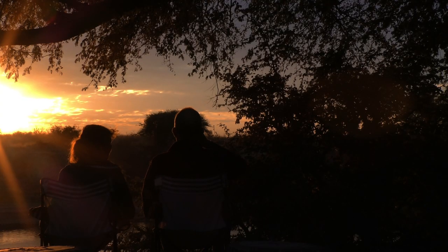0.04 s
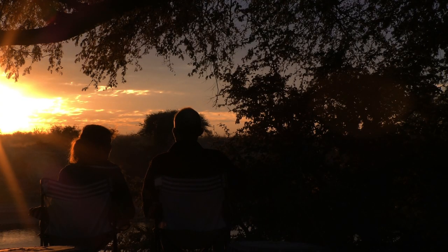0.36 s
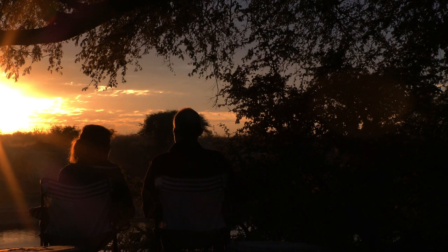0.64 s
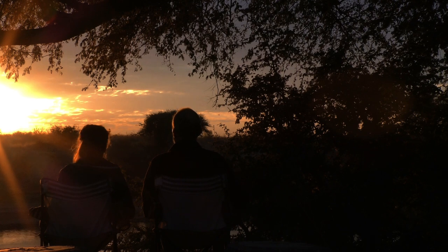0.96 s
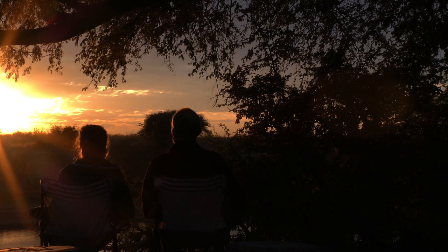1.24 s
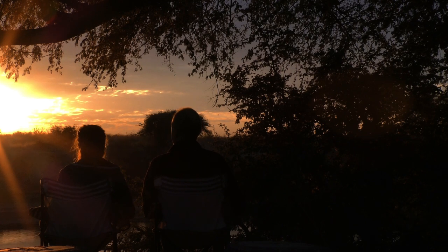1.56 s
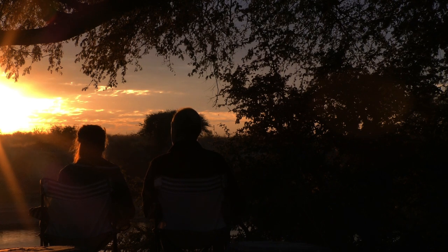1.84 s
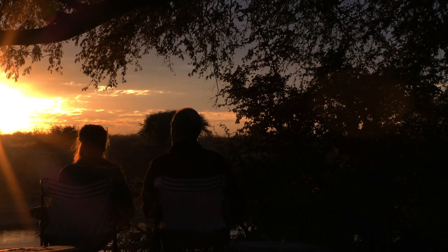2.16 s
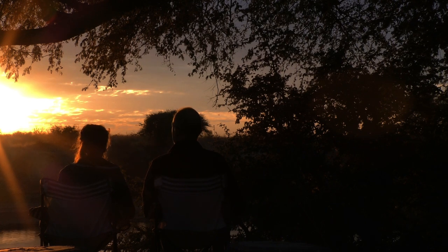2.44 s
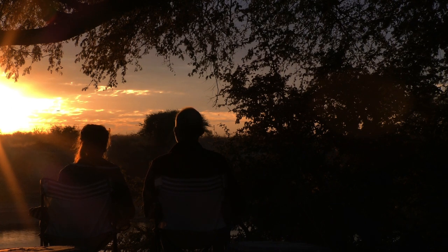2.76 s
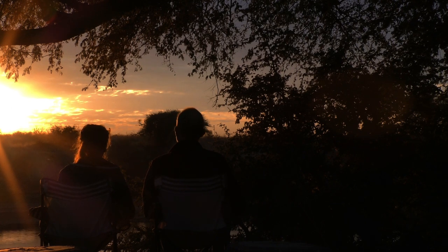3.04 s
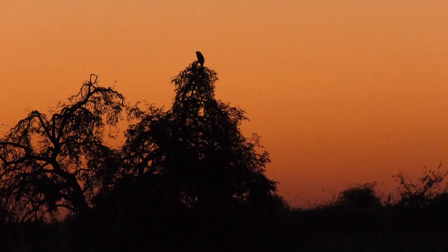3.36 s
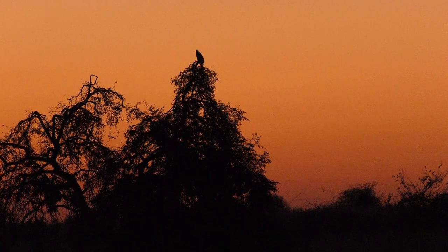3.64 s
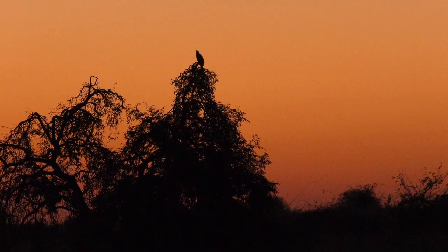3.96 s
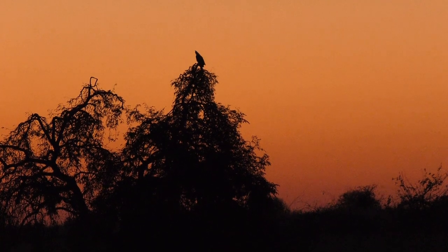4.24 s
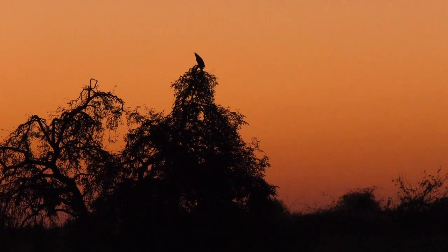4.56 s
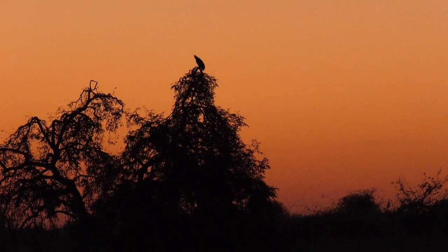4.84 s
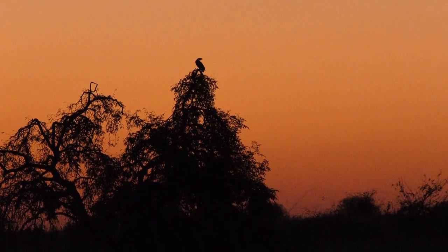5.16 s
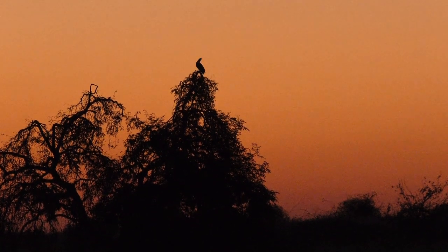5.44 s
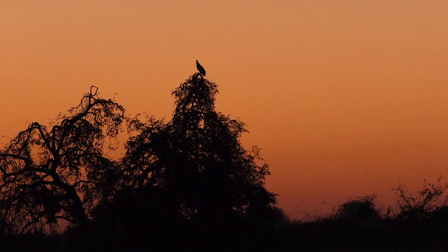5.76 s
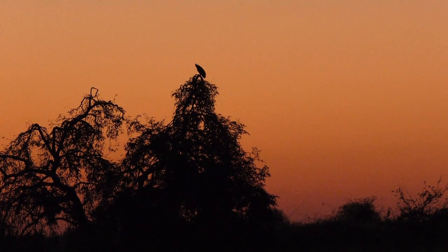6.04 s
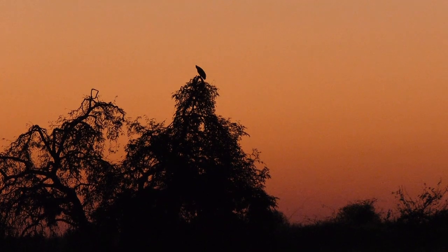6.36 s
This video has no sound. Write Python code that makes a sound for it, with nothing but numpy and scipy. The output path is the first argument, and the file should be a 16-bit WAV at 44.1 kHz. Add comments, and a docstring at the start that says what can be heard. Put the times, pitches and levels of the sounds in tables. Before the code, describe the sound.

Sharp bird chatter and dry trills in open bush, then softer calls and four high eagle yelps, over rumbling air and faint hum.

```python
"""Dusk by a savanna river, over a low rumble of air, soft bumps, a small motor's hum and a hiss.
First small birds chatter: sharp yaps, chirps that grow out of clicks, and thin, far-off whistles.
Dry trills of clicks join in after a second. Everything fades to silence just after three seconds,
then returns with softer chatter. Near five seconds a fish eagle starts to yelp, four times in all:
its voice scoops up, cracks into a held note and drops, and the bush echoes it."""
import sys
import numpy as np
from scipy import signal
from scipy.fft import rfft, irfft, next_fast_len
from scipy.io import wavfile

SR = 44100
rng = np.random.default_rng(int(sys.argv[2]) if len(sys.argv) > 2 else 0)


def unload_audio(sound):
    """Save the sound as a 16-bit wav file, at the path given as the first command line argument."""
    columns = np.transpose(np.atleast_2d(sound))
    # keep every value between -1 and 1, then stretch to whole-number steps
    steps = np.round(np.clip(columns, -1, 1) * 32767)
    wavfile.write(sys.argv[1], SR, steps.astype(np.int16))


N = 290619
T = np.arange(N) / SR
SILENCE_S = 3.235   # the moment between fading out and fading in


def from_db(db):
    """Turn decibels into a number to multiply a sound by."""
    return 10 ** (np.asarray(db) / 20)


def unit_power(x):
    """Scale a sound so that its average power is 1."""
    return x / np.sqrt(np.mean(x ** 2) + 1e-20)


def along(rows, t):
    """Join a table's rows with straight lines and read them where the first column equals t."""
    points, *columns = np.transpose(rows)
    return [np.interp(t, np.sort(points), column) for column in columns]


def waver(size, rate):
    """A random wobble, about 1 in size, that heads for a new value `rate` times a second."""
    knots = np.arange(size) * rate / SR
    return np.interp(knots, np.arange(size), rng.standard_normal(size))


def phase_of(hz):
    """The angle a vibration has turned through as it follows a changing pitch."""
    return 2 * np.pi * np.cumsum(hz) / SR


def band(x, low_hz, high_hz):
    """Keep what lies between two frequencies and soften the rest."""
    return signal.sosfilt(signal.butter(2, [low_hz, high_hz], "band", fs=SR, output="sos"), x)


def add(out, start_s, sound):
    """Mix a sound in at its start time."""
    i = round(start_s * SR)
    lo, hi = max(i, 0), min(i + len(sound), N)
    if hi > lo:
        out[lo:hi] += sound[lo - i:hi - i]


def placed(x, left_db):
    """Set a sound to one side; below zero means to the right."""
    return x * from_db([[left_db / 2], [-left_db / 2]])


def stereo_noise(spectrum):
    """Steady noise, alike in both ears in the bass and mostly different in the high treble."""
    # how alike the two ears are: (frequency [Hz], likeness [0-1])
    likeness = [(30, 0.94), (300, 0.96), (1000, 0.52), (3000, 0.95), (5000, 0.21), (8000, .15), (15000, .1)]
    size = next_fast_len(N)
    log_hz = np.log(np.maximum(np.arange(size // 2 + 1) * SR / size, 1))
    hz, db = np.transpose(spectrum)
    outside = np.abs(log_hz - np.clip(log_hz, np.log(hz[0]), np.log(hz[-1])))
    gain = from_db(np.interp(log_hz, np.log(hz), db) - 40 * outside) * np.sqrt(SR / 2)
    alike_hz, alike = np.transpose(likeness)
    alike = np.interp(log_hz, np.log(alike_hz), alike)
    width = np.sqrt((1 - alike) / (1 + alike))
    mid, side = rfft(rng.standard_normal((2, size))) * gain
    return irfft(mid + width * side * [[1], [-1]], size)[:, :N]


def background():
    """Air rumbles, a hiss runs on and a motor hums at a slightly uneven speed."""
    # Each table holds one list for before the silence and one for after it.
    # rumble of the air: (frequency [Hz], relative level [dB])
    rumbles = [
        [(15, 11), (29, -2.5), (59, -12), (100, -19.5), (150, -27.5), (230, -27.5), (330, -29), (470, -36.5),
         (700, -63)],
        [(15, 8), (32, -10.5), (52, -25), (70, -32), (130, -40), (180, -46), (330, -43), (470, -54), (700, -54)],
    ]
    # hiss: (frequency [Hz], level in a band 1 Hz wide [dB])
    hisses = [
        [(400, -92), (700, -84.5), (1200, -88.5), (2500, -87), (4500, -90.5), (6000, -92), (10000, -92.5),
         (15000, -93.5)],
        [(400, -98), (700, -89), (1400, -93), (2500, -95), (4500, -100.5), (6500, -97), (8400, -93.5),
         (9100, -102), (10300, -102), (11200, -91.5), (13500, -89), (15000, -91)],
    ]
    # tones of the motor: (pitch [Hz], level [dB])
    hums = [
        [(252, -47.5), (504, -65)],
        [(253.5, -56), (507, -67)],
    ]
    parts, rumble_levels_db = [T < SILENCE_S, T >= SILENCE_S], [-32.5, -23.5]
    out = 0
    for part, rumble, rumble_db, hiss, hum in zip(parts, rumbles, rumble_levels_db, hisses, hums):
        speed = 1 + .0036 * waver(N, 12)
        motor = sum(from_db(db + 1.4 * waver(N, 13)) * np.sin(phase_of(hz * speed)) for hz, db in hum)
        air = from_db(rumble_db) * unit_power(stereo_noise(rumble))
        out = out + part * (air + stereo_noise(hiss) + motor)
    return out


def bumps(swell_s=.024):
    """Short, muffled swells of low noise."""
    # soft bumps: (time [s], pitch [Hz], level [dB])
    swells = [(1.568, 228, -43), (1.631, 205, -38), (1.634, 75, -42), (1.662, 366, -47.5),
              (2.952, 178, -38), (3.387, 70, -32.5), (3.52, 126, -43), (3.889, 122, -43.5),
              (4.56, 125, -47), (4.655, 139, -49), (5.525, 64.4, -35.5), (6.055, 123, -40)]
    out, t = np.zeros(N), np.arange(-2 * swell_s, 2 * swell_s, 1 / SR)
    for s, hz, db in swells:
        noise = band(rng.standard_normal(SR // 2), hz * .72, hz * 1.2)[-len(t):]
        add(out, s + t[0], from_db(db) * unit_power(noise) * np.exp(-(t / swell_s) ** 2))
    return out


def bush(x, echo_s, echo_db, tail_db, decay_s, onset_s):
    """The nearest trees send back one echo; farther ones scatter the sound into a dying tail."""
    t = np.arange(2 * SR) / SR
    scatter = band(rng.standard_normal(len(t)), 600, 4900) * from_db(-60 * t / decay_s)
    scatter *= 1 - np.exp(-(t / onset_s) ** 2)
    response = from_db(tail_db) * scatter / np.sqrt(np.sum(scatter ** 2))
    response[round(echo_s * SR)] += from_db(echo_db)
    return x + signal.fftconvolve(x, response)[:N]


def bush_ring(start_db=-56.5, loss_db_per_s=9):
    """Narrow, dying noise: the bush rings faintly at the eagle's pitch as the sound fades in."""
    level_db = start_db - loss_db_per_s * (T - SILENCE_S) + 3 * waver(N, 14)
    ring = unit_power(band(rng.standard_normal(N), 1250, 1620))
    return (T >= SILENCE_S) * from_db(level_db) * ring


def whistles(octave_db=-18, jitter=.001):
    """Far-off birds whistle notes that rise and fall, with a faint tone an octave above."""
    # whistles: (time [s], length [s], pitch [Hz], level [dB], glide [octaves])
    notes = [(.193, 0.15, 2325, -37.5, 0.014), (1.098, 0.16, 2290, -34, -0.027),
             (2.089, .11, 924, -51, -0.27)]
    # shape of one whistle: (share of its length [0-1], pitch [ratio], level [dB])
    shape = [(0, .87, -6.5), (.27, 0.96, 0), (.58, 1, 1), (.87, .988, 0), (1, .94, -12.5)]
    out = np.zeros(N)
    for s, length, hz, db, glide in notes:
        share = np.linspace(0, 1, int(length * SR))
        ratio, shape_db = along(shape, share)
        pitch = hz * ratio * 2 ** (glide * (share - .5))
        phase = phase_of(pitch * (1 + jitter * waver(len(share), 300)))
        tone = np.sin(phase) + from_db(octave_db) * np.sin(2 * phase)
        add(out, s, tone * from_db(db + shape_db) * signal.windows.tukey(len(share), .1))
    return out


def click(top_hz, bottom_hz, length_s):
    """A bird's voice box opens once and lets out a tiny, steeply falling whistle."""
    size = max(int(length_s * SR), 8)
    pitch = np.linspace(top_hz, bottom_hz, size) * rng.normal(1, .044)
    return np.sin(phase_of(pitch)) * np.hanning(size)


def trills(first_s=1.156, period_s=.1085, slowing_s=.00045, count=18, gain_db=-2):
    """Dry runs of clicks that slow down as they swell and hurry as they die."""
    # stray trills after the long series: (time [s], length [s], relative level [dB])
    strays = [(4.023, 0.011, -41.5), (4.335, .031, -43.5), (4.433, 0.025, -37), (4.655, .018, -37),
              (4.747, .023, -46)]
    series = [(first_s + k * (period_s + k * slowing_s), .088, -30.5) for k in range(count)]
    out = np.zeros(N)
    for start, length, db in series + strays:
        s = 0
        while s < length:
            swell = np.sin(np.pi * (s / length) ** 1.4)
            high = click(top_hz=4300 + 450 * swell, bottom_hz=2250, length_s=.0028)
            gain = from_db(db + gain_db + 8 * (swell - 1) + rng.normal(0, 1.6))
            low = from_db(-10) * click(top_hz=2750, bottom_hz=1160, length_s=.00248)
            add(out, start + s, gain * high)
            add(out, start + s, gain * low)
            s += .005 + .003 * swell
    return out


def chirps(edge_s=.00097, click_count=9, gap_s=.0042, widening_s=.0002):
    """Clicks swell, crowd together and melt into a clear whistle that flicks up at its end."""
    # chirps: (time [s], length [s], pitch [Hz], level [dB])
    notes = [(-.025, 0.079, 4600, -25), (0.187, 0.076, 4547, -25), (0.389, 0.081, 4484, -25),
             (0.603, 0.086, 4416, -25), (0.826, .062, 4355, -25), (1.022, 0.065, 4200, -26),
             (1.751, .028, 3600, -43.5), (1.976, 0.032, 3690, -41.5), (2.322, 0.019, 4300, -30.5),
             (2.466, .05, 3920, -33.5), (2.623, .065, 3880, -38), (4.1, 0.02, 4300, -43),
             (4.263, 0.031, 4650, -42), (4.441, 0.033, 4220, -49), (4.625, .04, 4150, -49.5),
             (4.82, 0.027, 4040, -49)]
    # shape of one chirp: (share of its length [0-1], pitch [ratio])
    shape = [(0, .985), (.13, 1.018), (.55, 0.9906), (.75, 1.003), (.9, 1.066), (1, 1.146)]
    out = np.zeros(N)
    for s, length, hz, db in notes:
        # soft chirps slide up more, have weaker clicks and hold their pitch less steadily
        rise_octaves = np.interp(db, [-32, -27], [.21, .012])
        clicks_db = np.interp(db, [-32, -27], [-6, 1])
        jitter = np.interp(db, [-45, -25], [.026, .007])
        growth_db = np.interp(hz, [4350, 4600], [.24, 1.4])   # clicks swell faster before high notes
        for k in range(click_count):   # counted backwards from the note
            lead = click(top_hz=5300 - 100 * k, bottom_hz=2600, length_s=.0028 + .003 / (1 + k))
            ahead_s = (k + 1) * (gap_s + k * widening_s)
            add(out, s - ahead_s, lead * from_db(db + clicks_db - growth_db * k * k))
        t = np.arange(0, length, 1 / SR)
        ratio, = along(shape, t / length)
        slide = 2 ** (rise_octaves * (t / length - .5))
        pitch = hz * ratio * slide * (1 + jitter * waver(len(t), 900))
        edges = np.clip(np.minimum(t, (length - t) / 3) / edge_s, 0, 1)
        add(out, s, np.sin(phase_of(pitch)) * edges * from_db(db + .37 * waver(len(t), 180)))
    return out


def yaps(jitter=.036, rasp_db=-11, between_db=-7.5):
    """Each yap starts hoarse and rises in pitch; most clear into a clean tone."""
    # yaps: (time [s], pitch [Hz], level [dB], brightness [dB], lasting hoarseness [0-1])
    calls = [(.084, 1171, -21, -0.5, 0), (.334, 1175, -21, -2, 0.2), (.607, 1170, -21, -0.5, 0),
             (.877, 1172, -22, 0, 0.2), (1.195, 1175, -22, -.5, 0.2), (1.533, 1177, -22.5, 0.5, 0.2),
             (1.858, 1160, -22, 1, 0.2), (2.294, 1022, -24.5, 11, .05), (3.182, 1020, -35.5, 15, 0),
             (3.488, 1106, -35, -0.5, 0), (3.855, 1093, -34.5, -1, 0), (4.233, 1118, -34, -1.5, 0),
             (4.564, 1187, -31.5, -0.5, 0.2), (4.988, 1082, -34, 6.5, 0.4), (5.962, 1020, -38, 6, 0.88),
             (6.284, 1198, -36, -3, 0.85), (6.568, 1090, -34, -5, 0.18)]
    # shape of one yap: (time [s], pitch [ratio], level [dB], roughness [0-1])
    shape = [(-.008, .6, -28, 1), (.001, .87, -12, 1), (.007, .94, -4, .7), (.018, .98, -1, .35),
             (.03, 1.015, -1, .15), (.038, 1.035, 1, .05), (.043, 1.055, -4, .05), (.048, 1.05, -28, .05)]
    # tones in a yap: (pitch [multiple], level [dB], change from middle to end [dB], brightness [weight])
    tones = [(1, -18, -6, -0.93), (2, -3.5, 2, 0.12), (3, -14, -14, 0.97), (4, -22, -1.5, 1.55),
             (5, -28, -6.5, 1.26), (6, -45, -0.5, 1.5)]
    out, t = np.zeros(N), np.arange(shape[0][0], shape[-1][0], 1 / SR)
    ratio, shape_db, onset_rough = along(shape, t)
    late = np.linspace(-1, 1, len(t))
    for s, hz, db, bright_db, hoarse in calls:
        rough = np.maximum(onset_rough, hoarse)
        phase = phase_of(hz * ratio * (1 + jitter * rough * waver(len(t), 1200)))
        voice = sum(from_db(level_db + change_db * late + weight * bright_db) * np.sin(round(k) * phase)
                    for k, level_db, change_db, weight in tones)
        # in high yaps strong and weak vibrations take turns, which adds an in-between tone
        strain = np.clip((hz - 1050) / 130, 0, 1)
        voice += from_db(between_db) * strain * np.sqrt(onset_rough) * np.sin(2.5 * phase)
        breath = unit_power(band(rng.standard_normal(len(t)), 1400, 3700))
        voice += from_db(rasp_db) * rough * breath
        add(out, s + t[0], voice * from_db(db + shape_db + waver(len(t), 250)))
    return out


def eagle_voice(hz, db, bright_db, jitter=.006, shimmer_db=.9):
    """A nearly pure note with overtones (higher tones above it) that the eagle's throat colours."""
    # overtones: (pitch [multiple], level [dB], how closely it follows the brightness [0-1])
    overtones = [(2, -1.5, 0.96), (3, -12, 1), (4, -22.5, 0.43), (5, -25, 0.85)]
    # how the throat lifts or dulls the overtones: (frequency [Hz], gain [dB])
    throat = [(1300, 12), (1900, 6.5), (2550, -1.5), (3100, -2), (3600, -3.5), (3950, 5), (4350, -14),
              (4700, 1.5), (5400, 3.5), (5700, -22), (7000, -21)]
    size = len(hz)
    overtones_db = np.minimum(bright_db - db, 0)
    creak = np.interp(hz, [800, 1080], [6, 1])   # the voice creaks on its lowest notes
    phase = phase_of(hz * (1 + jitter * creak * waver(size, 497)))
    voice = np.sin(phase)
    for k, level_db, follows in overtones:
        flutter_db = 2.2 * waver(size, 70)
        throat_db, = along(throat, k * hz)
        gain = from_db(level_db + follows * overtones_db + throat_db + flutter_db)
        voice += gain * np.sin(round(k) * phase)
    tremble_db = shimmer_db * creak * waver(size, 200)
    return voice * from_db(db + tremble_db) * signal.windows.tukey(size, .05)


def eagle_yelps(slack_hz=601, slack_db=-45, slack_bright_db=-58, flare_s=.035, dip_db=-6):
    """The slack voice scoops up, cracks into a held note and drops back to slack."""
    # yelps: (time [s], scoop length [s], scoop top [Hz], scoop level [dB], brightness [dB],
    #         extra brightness at the crack [dB], drop length [s])
    calls = [(4.841, .056, 1240, -19.5, -47.5, -3, 0.011), (5.434, .022, 1175, -27, -57, 30, 0.025),
             (5.833, .03, 938, -33, -53, 3, 0.0245), (6.182, .058, 972, -30.5, -56, 11, .034)]
    # held note, one list for each yelp: (time [s], pitch [Hz], level [dB])
    held_notes = [
        [(4.943, 1351, -28.5), (4.983, 1392, -14.5), (4.995, 1360, -10.5), (5.053, 1287, -19.5),
         (5.085, 1275, -18), (5.095, 1241, -30), (5.12, 1195, -21)],
        [(5.547, 1520, -16), (5.569, 1438, -13), (5.591, 1360, -16.5), (5.607, 1227, -39), (5.629, 1163, -37),
         (5.659, 1175, -17.5), (5.683, 1236, -28.5), (5.7, 1100, -20.5)],
        [(5.863, 1130, -26), (5.883, 1171, -24), (5.921, 1073, -32.5), (5.941, 1089, -30), (5.963, 1167, -18),
         (5.985, 1151, -15), (6.02, 1040, -25.5)],
        [(6.239, 1135, -25), (6.247, 1155, -19.5), (6.287, 1150, -17.5), (6.311, 1119, -19.5),
         (6.337, 1027, -27), (6.345, 1000, -27.5)],
    ]
    out = np.zeros(N)
    for (s, length, top_hz, top_db, bright_db, flare_db, drop_s), held in zip(calls, held_notes):
        share = np.linspace(0, 1, int(length * SR))
        scoop_hz = slack_hz + (top_hz - slack_hz) * (1 - (1 - share) ** 2.31)
        scoop_db = slack_db + (top_db - slack_db) * np.sin(share * np.pi / 2)
        scoop = eagle_voice(scoop_hz, scoop_db, slack_bright_db)
        add(out, s, scoop * signal.windows.tukey(len(share), .25))

        start, end = held[0][0], held[-1][0]
        t = np.arange(start - .002, end + drop_s, 1 / SR)
        hz, db = along(held, t)
        drop = np.clip((t - end) / drop_s, 0, 1)
        hz += (slack_hz - hz) * drop
        db += (slack_db - db) * drop + dip_db * np.sin(np.pi * drop)
        shine_db = bright_db + flare_db * np.exp((t[0] - t) / flare_s)
        shine_db += (slack_bright_db - bright_db) * np.sqrt(drop)
        flicker_db = 1.5 * waver(len(t), 300)
        add(out, t[0], eagle_voice(hz, db, shine_db + flicker_db))
    return out


def eagle_pressed_notes(sag_share=.0957, sag_db=10.5):
    """In the first two yelps the other side of the voice box presses out a note that rises and falls."""
    # notes: (time [s], length [s], top pitch [Hz], time to the top [s], level [dB], brightness [dB])
    notes = [(4.893, 0.091, 1688, 0.065, -24, -43.5), (5.449, .102, 1300, .054, -21, -27)]
    out = np.zeros(N)
    for s, length, top_hz, top_s, db, bright_db in notes:
        sag = (np.arange(0, length, 1 / SR) / top_s - 1) ** 2   # 1 at the start, 0 at the top
        pitch = top_hz * (1 - sag_share * sag)
        add(out, s, eagle_voice(pitch, db - sag_db * sag, bright_db - sag_db * sag))
    return out


def scene(fade_out_s=.76, fade_in_s=.64):
    """All the birds in the open bush, over the background; everything fades out and in once."""
    yelps = eagle_yelps() + eagle_pressed_notes()
    eagle = bush(yelps, echo_s=.029, echo_db=-18, tail_db=-24, decay_s=1.2, onset_s=.014)
    chatter = bush(whistles(), echo_s=.043, echo_db=-31, tail_db=-19.5, decay_s=.53, onset_s=.03)
    chatter += bush(yaps(), echo_s=.046, echo_db=-18.5, tail_db=-28, decay_s=.45, onset_s=.03)
    chatter += bush(chirps(), echo_s=.034, echo_db=-26, tail_db=-31.5, decay_s=.48, onset_s=.03)
    chatter += bush(trills(), echo_s=.012, echo_db=-28, tail_db=-21, decay_s=.6, onset_s=.01)
    mix = placed(eagle + bush_ring(), left_db=-.4) + placed(chatter + bumps() + background(), left_db=-.5)
    fade = np.maximum((SILENCE_S - T) / fade_out_s, (T - SILENCE_S) / fade_in_s)
    return np.clip(fade, 0, 1) * mix


def record(dry, cutoff_hz=15150):
    """A steep filter takes away the very highest treble."""
    return signal.sosfiltfilt(signal.ellip(10, .05, 70, cutoff_hz, fs=SR, output="sos"), dry)


dry = scene()
out = record(dry)
unload_audio(out)
```